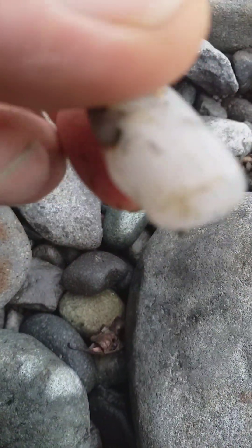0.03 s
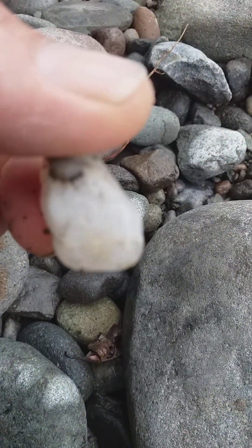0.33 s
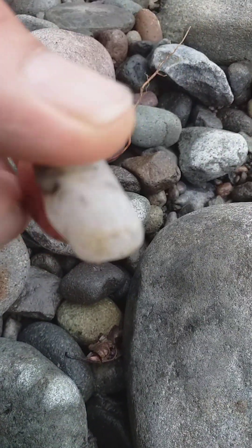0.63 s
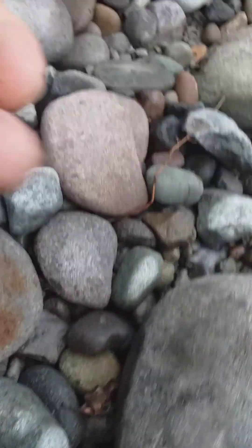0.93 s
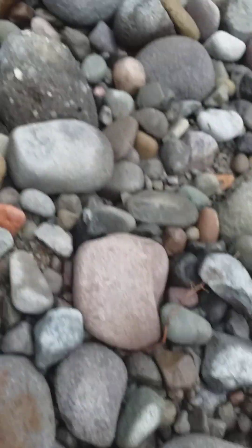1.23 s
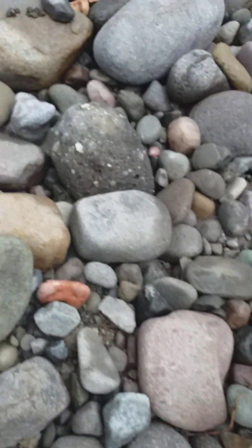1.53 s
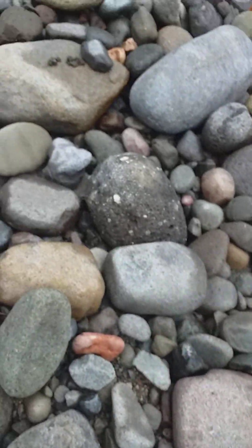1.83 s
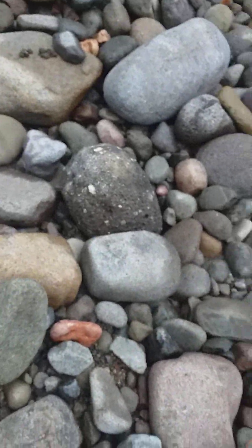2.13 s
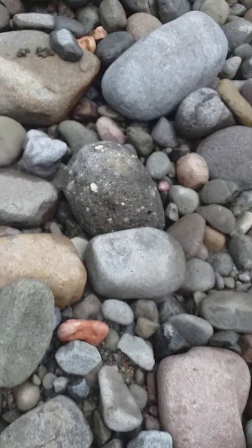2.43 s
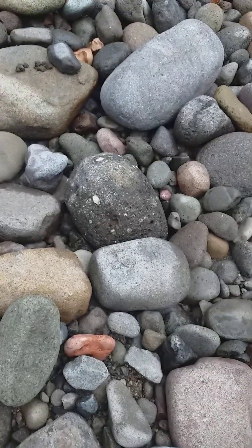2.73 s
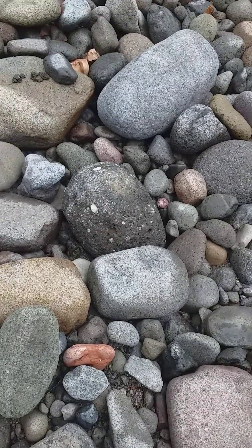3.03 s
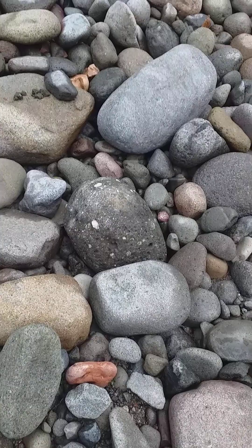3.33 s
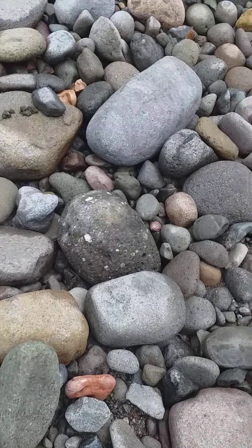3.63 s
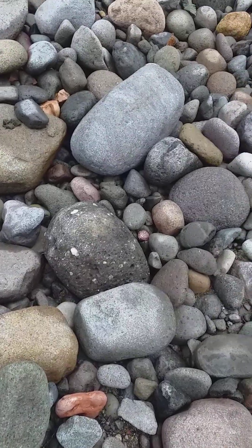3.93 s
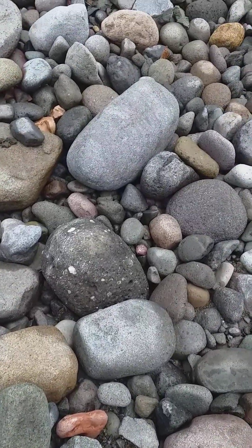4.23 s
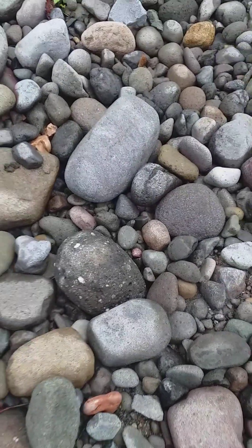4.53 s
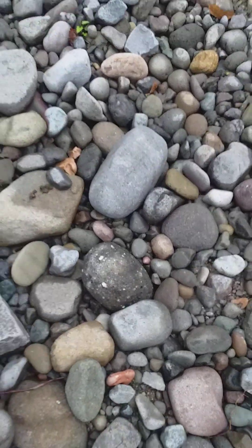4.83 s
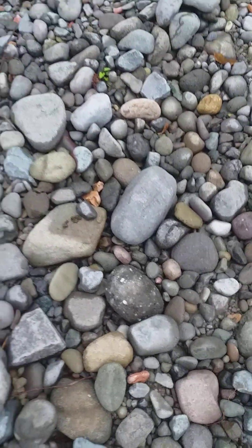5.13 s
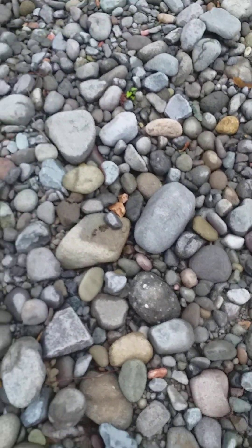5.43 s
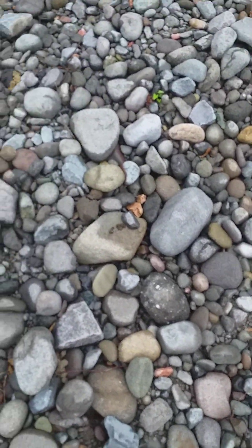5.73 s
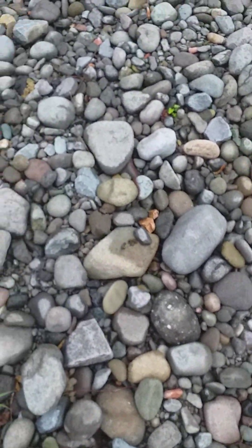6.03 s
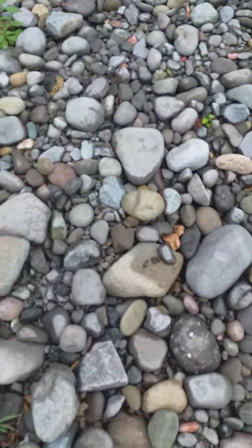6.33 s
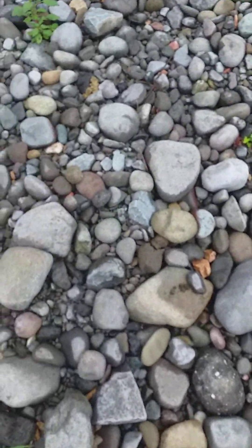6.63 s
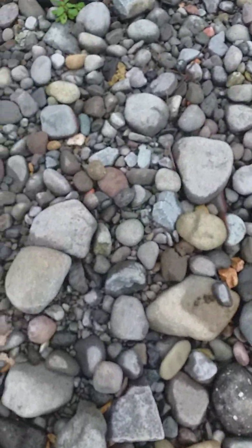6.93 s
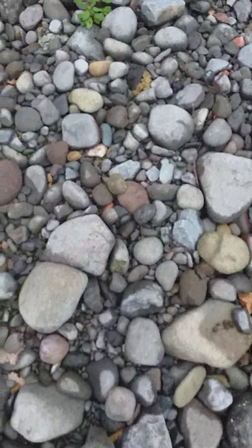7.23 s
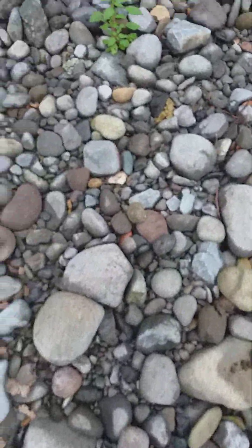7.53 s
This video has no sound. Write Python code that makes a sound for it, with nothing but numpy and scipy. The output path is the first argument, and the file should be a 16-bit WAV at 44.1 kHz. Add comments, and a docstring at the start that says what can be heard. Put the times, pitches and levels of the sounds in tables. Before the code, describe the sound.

A nearby stream hisses softly and steadily, with a faint rumble of air at first. A few small stones tick, then pebbles clack sharply underfoot about two seconds in. Feet shift on the stony bank, crunching and scraping with dull thuds, busiest just past the middle. After a short pause come a few lighter scrapes and clicks. The water grows slightly brighter as the close microphone rises.

```python
"""Feet shifting on a pebble bank as someone stands up from a crouch, a stream rushing nearby.
Stones knock and ring, gravel sticks and slips under the soles, the bed thuds under the weight.
Splashes make the stream's hiss, tumbling water its murmur; moving air rumbles faintly.
The microphone rises, so the water opens up and the dip from the ground echo slides down."""
import sys
import numpy as np
from scipy import signal
from scipy.fft import rfft, irfft
from scipy.io import wavfile
from scipy.ndimage import uniform_filter1d

SR = 44100
rng = np.random.default_rng(int(sys.argv[2]) if len(sys.argv) > 2 else 0)


def waveform_to_disk(signal):
    """Save audio, clipped to [-1, 1], as 16-bit WAV at the path in sys.argv[1]."""
    frames = np.transpose(np.atleast_2d(signal))
    scaled = np.clip(frames, -1, 1) * 32767
    samples = np.round(scaled).astype(np.int16)
    wavfile.write(sys.argv[1], SR, samples)


N = 343539
TIME_S = np.arange(N) / SR
FIRST_MOVE_S, FADE_IN_S = 0.6, 0.35
CREEP_PEBBLES_DB, CREEP_SAND_DB = -58.5, -64.5  # resting levels between scrapes

# Air at the microphone. Each row: time in seconds, level in dB.
AIR_LEVELS = [(0, -57), (.35, -60), (.7, -63.5), (1.3, -74), (1.7, -59.5), (2.0, -70), (7.3, -76),
              (7.7, -66)]
# Stream. Each row: time in seconds, relative hiss in dB, relative murmur in dB.
STREAM_LEVELS = [(0, -57, -53), (.8, -56.5, -54), (1.4, -52.5, -53.5), (2.02, -52, -53), (2.68, -56, -58.5),
                 (3.8, -49.5, -54.5), (5.15, -50, -55), (5.65, -48, -53), (6.55, -47.5, -54),
                 (7.68, -47.5, -51.5)]
# Ground echo cancellation. Each row: time in seconds, dip centre in Hz, depth in dB.
GROUND_DIPS = [(0, 1500, 3.5), (.65, 1390, 9), (1.1, 1270, 4), (1.6, 980, 2.5), (2.6, 830, 4),
               (3.7, 850, 6), (4.3, 930, 4), (5.2, 760, 1.5), (7.7, 740, 2.5)]
# Weight settling. Each row: start, rise and hold in seconds, relative level in dB.
TREADS = [(2.09, 0.044, 0.022, -42), (2.31, .04, 0.063, -53), (3.88, 0.048, 0.3, -54.5),
          (4.22, 0.025, 0.45, -47.5), (6.01, 0.054, 0.015, -45.5), (6.8, 0.057, .05, -53)]
# A faint high rustle, then sole scrapes.
# Each row: start, rise and hold in seconds, relative pebble and sand levels in dB.
RUSTLE_AND_SCRAPES = [(.68, .17, 0.057, -63, -63), (1.12, 0.021, 0.066, -53.5, -79),
                      (1.525, 0.008, 0.037, -48, -50), (1.6, 0.028, 0.095, -50.5, -74),
                      (1.82, 0.086, 0.075, -49, -55.5), (2.083, 0.006, .02, -45, -40.5),
                      (2.118, 0.0084, 0.031, -28.5, -41), (2.18, 0.0081, 0.014, -44, -42.5),
                      (2.235, 0.031, 0.011, -35, -41.5), (2.315, 0.024, 0.074, -38.5, -49),
                      (2.43, 0.017, 0.12, -51, -53), (2.62, 0.015, 0.0081, -44.5, -59),
                      (2.7, 0.074, 0.028, -56, -54.5), (2.86, .11, 0.05, -45, -48.5),
                      (3.035, 0.028, 0.18, -39, -43.5), (3.25, 0.014, 0.041, -37, -45.5),
                      (3.4, 0.017, 0.088, -44, -48), (3.51, 0.027, 0.034, -41, -44),
                      (3.62, 0.013, 0.11, -48.5, -54.5), (3.89, 0.013, 0.081, -39.5, -48.5),
                      (3.975, 0.04, 0.021, -35, -38.5), (4.055, 0.021, 0.011, -30.5, -44.5),
                      (4.14, 0.028, 0.081, -36, -43.5), (4.235, .02, 0.058, -30.5, -37),
                      (4.32, 0.021, 0.098, -34, -37.5), (4.42, 0.04, .16, -29, -39.5),
                      (4.605, 0.032, 0.0086, -27, -53), (4.66, 0.013, 0.041, -34.5, -43),
                      (5.4, 0.005, 0.2, -48, -76), (5.6, 0.035, 0.079, -45.5, -61),
                      (5.89, 0.019, 0.01, -40, -49), (5.96, .01, 0.057, -51.5, -52.5),
                      (6.02, 0.068, 0.039, -36, -56), (6.13, .02, 0.085, -53, -64),
                      (6.26, 0.042, 0.027, -41.5, -65), (6.76, 0.012, 0.14, -43.5, -55),
                      (7.4, 0.021, 0.022, -44, -65), (7.48, .02, 0.21, -54, -66)]
# Clearest stone knocks. Each row: start in seconds, relative level in dB, nominal clack centre in Hz,
# clack width in octaves, ring in Hz, t60 in seconds, relative bright crack in dB.
KNOCKS = [(1.055, -51, 2600, 0.43, 2800, 0.0088, -19), (1.1997, -46, 2770, 0.55, 2520, 0.016, -14),
          (1.332, -46.5, 3300, 0.5, 4500, 0.036, -20), (1.629, -34.5, 3800, 0.67, 4700, 0.022, -23),
          (1.7337, -44.5, 3020, 0.33, 2970, 0.03, -24), (1.8424, -42.5, 3760, 0.55, 2170, .028, -12),
          (1.903, -37, 4300, 0.49, 3030, .01, -9), (2.0935, -13.5, 3800, 0.44, 5830, 0.0092, -18),
          (2.1192, -14, 5850, 0.68, 6200, 0.013, -1), (2.2766, -22.5, 5140, 0.48, 7000, 0.0065, -21),
          (2.823, -42, 5600, .45, 6300, 0.0081, -4), (2.96, -36.5, 4540, 0.71, 3110, 0.028, -8),
          (3.088, -34, 4400, .6, 4200, .02, -9), (3.1094, -33, 4860, 1, 5100, 0.034, -11),
          (3.3476, -34, 5140, 0.47, 4340, 0.0096, 1), (3.4038, -38, 4500, 0.8, 3960, 0.014, -5),
          (3.549, -33, 5240, 0.34, 6000, 0.011, -10), (3.6587, -37.5, 3680, .65, 3000, .05, -9),
          (3.7096, -40, 3830, .65, 2650, 0.033, -2), (3.825, -30, 4300, 0.23, 4380, 0.0036, -11),
          (3.925, -35, 3920, 0.53, 3000, 0.01, -7), (4.1199, -35, 3750, .8, 3070, 0.087, -7),
          (4.1523, -38, 3600, 0.87, 3080, 0.022, -5), (4.2596, -27.5, 3400, 1, 3900, 0.042, -20),
          (4.3342, -29, 5700, 0.43, 7450, .017, -15), (4.3558, -21, 4970, 0.55, 7900, 0.021, -17),
          (4.3953, -21.5, 4350, 0.38, 3540, 0.015, -1), (4.4648, -22, 4800, 0.62, 4020, 0.17, -4),
          (4.552, -24.5, 4180, .4, 2710, 0.097, -13), (4.6252, -22.5, 3760, 0.28, 3900, 0.056, -29),
          (4.633, -21.5, 3580, 0.3, 3220, 0.073, -24), (4.657, -24, 4300, .25, 3780, 0.015, -20),
          (4.752, -35, 5100, 0.48, 3540, 0.018, -6), (4.787, -42.5, 4800, 0.41, 4150, .014, -16),
          (4.81, -39, 3400, 0.85, 1130, 0.0088, -19), (4.8402, -40, 5200, 0.69, 7100, .016, -11),
          (5.702, -36, 6800, 0.36, 7700, .015, -9), (6.0939, -28.5, 4080, 0.39, 4100, 0.035, -9),
          (6.1802, -34.5, 4300, 0.34, 3400, .013, -9.5), (6.2046, -38, 4530, 0.18, 4430, 0.0088, -24),
          (6.291, -33.5, 3960, 0.35, 4570, 0.0085, -23), (6.3147, -31.5, 4430, .45, 3530, 0.0045, -19),
          (6.421, -40.5, 4000, 0.39, 4480, 0.0088, -17), (6.792, -35.5, 3900, 0.52, 2500, 0.016, -5),
          (6.8398, -38.5, 2670, .45, 2430, 0.022, -17), (6.8851, -31, 4030, 0.37, 5200, 0.0089, -9),
          (7.0086, -28, 3380, 0.63, 4320, 0.0068, -36), (7.3293, -41, 4330, 0.38, 7160, .012, -28)]
# Source spectra. Each row: frequency in Hz, relative density in dB.
AIR_SPECTRUM = [(25, -7), (55, -3.5), (110, 3.5), (200, -4), (500, -61)]
HISS_SPECTRUM = [(60, -33.5), (300, -2), (700, 1.5), (1100, 0.5), (1800, 0), (2250, -1.5), (3000, 0.5),
                 (3800, 1.5), (4600, -1.5), (6000, -5.5), (7600, -4), (10000, -12), (16000, -18.5)]
MURMUR_SPECTRUM = [(30, -25), (55, -8), (90, -11), (150, -1.5), (250, 2), (350, 1), (500, -1), (700, -5.5),
                   (1000, -16), (2000, -45)]
BED_SPECTRUM = [(30, -31), (60, -40), (120, -4.5), (250, 1.5), (400, -2.5), (700, -4), (1200, -13.5),
                (2500, -41)]
SAND_SPECTRUM = [(1500, -4.5), (4000, 3), (7000, 4), (9500, -1), (12000, -1.5), (16000, -13.5)]
PEBBLE_SPECTRUM = [(50, -56), (200, -29), (600, -13), (1000, -4.5), (1450, -4), (2000, -2), (3000, -1),
                   (3950, 4), (5000, -2), (7500, -5), (10000, -11.5), (16000, -7.5)]
# Microphone response. Each row: frequency in Hz, gain in dB.
MIC_RESPONSE = [(30, -28), (42, -15), (55, 0), (7600, -1.5), (8100, -5), (8700, -12), (10000, -8.5),
                (12000, -5.5), (16000, -4)]


def amp(db):
    """Decibels to gain."""
    return 10 ** (np.asarray(db) / 20)


def unit_rms(x):
    """Scales to rms 1."""
    return x / np.sqrt(np.mean(x ** 2) + 1e-20)


def add(mix, start_s, sound):
    """Mixes a sound in place."""
    part = mix[round(start_s * SR):][:len(sound)]
    part += sound[:len(part)]


def follow(rows, column, t=TIME_S):
    """One table column, interpolated over time."""
    rows = np.asarray(rows)
    return np.interp(t, rows[:, 0], rows[:, column])


def minimum_phase(db):
    """Sharpest-starting impulse response with this spectrum."""
    log_gain = np.log(amp(np.concatenate([db, db[-2:0:-1]])))
    return np.fft.ifft(np.exp(np.conj(signal.hilbert(log_gain)))).real


def coloured(x, spectrum, size=2048):
    """Filters by a spectrum table without blurring attacks."""
    table_hz, table_db = np.transpose(spectrum)
    hz = np.fft.rfftfreq(size, 1 / SR)
    db = np.interp(np.log(hz + 1), np.log(table_hz + 1), table_db)
    return signal.oaconvolve(x, minimum_phase(db))[:N]


def wander(rate_hz):
    """Random drift of rms 1, up to about this rate."""
    hz = np.fft.rfftfreq(N, 1 / SR)
    return unit_rms(irfft(rfft(rng.standard_normal(N)) / (1 + (hz / rate_hz) ** 4), N))


def clicks(per_s, spread_db):
    """Random impulses of either sign, many small, a few large."""
    strength = amp(spread_db * np.minimum(rng.exponential(1, N), 3.5))
    return strength * rng.choice([-1, 1], N) * (rng.random(N) < per_s / SR)


def pushes_db(rows, column, rest_db, release_db_per_s=432):
    """Level of pushes over a resting level: each builds, holds and dies away."""
    power = np.full(N, amp(rest_db) ** 2)
    t = np.arange(SR) / SR
    for row in rows:
        start_s, rise_s, hold_s = row[:3]
        attack = np.minimum(t / max(rise_s, 1 / SR), 1)
        release = amp(-release_db_per_s * np.maximum(t - rise_s - hold_s, 0))
        add(power, start_s, (amp(row[column]) * attack * release) ** 2)
    return 10 * np.log10(power)


def scatter(t60_s, size=4096):
    """Dying reflections off nearby stones, energy 1."""
    tail = rng.standard_normal(size) * amp(-60 * np.arange(size) / SR / t60_s)
    return tail / np.linalg.norm(tail)


def bank_reflections(x, wet_db=-10, t60_s=0.026, count=5):
    """Adds short echoes off the stones; their pattern shifts as feet and microphone move."""
    paths = np.array([wander(rate_hz=13.5) for _ in range(count)])
    paths /= np.linalg.norm(paths, axis=0)
    return x + amp(wet_db) * sum(signal.oaconvolve(x * path, scatter(t60_s))[:N] for path in paths)


def ground_dip(x, width_oct=0.36, size=1024):
    """The ground echo cancels one band, lower as the microphone rises."""
    hz, t, spectra = signal.stft(x, SR, nperseg=size)
    offset = np.log2((hz[:, None] + 1) / follow(GROUND_DIPS, 1, t)) / width_oct
    cut_db = follow(GROUND_DIPS, 2, t) * np.exp(-offset ** 2 / 2)
    return signal.istft(spectra * amp(-cut_db), SR, nperseg=size)[1][:N]


def air():
    """Faint, lumpy rumble of moving air."""
    rumble = unit_rms(coloured(rng.standard_normal(N), AIR_SPECTRUM, size=8192))
    return rumble * amp(follow(AIR_LEVELS, 1) + 3.6 * wander(rate_hz=12))


def stream(hiss_gain_db=3):
    """Countless small splashes hiss; tumbling water murmurs."""
    splashes = unit_rms(clicks(per_s=5000, spread_db=5.5))
    hiss = unit_rms(coloured(rng.standard_normal(N) + 0.63 * splashes, HISS_SPECTRUM))
    murmur = unit_rms(coloured(rng.standard_normal(N), MURMUR_SPECTRUM))
    hiss_db = follow(STREAM_LEVELS, 1) + hiss_gain_db + 0.5 * wander(rate_hz=84)
    murmur_db = follow(STREAM_LEVELS, 2) + 1.2 * wander(rate_hz=27)
    return hiss * amp(hiss_db) + murmur * amp(murmur_db)


def bed_thuds(gain_db=1):
    """Buried stones bump dully under the weight."""
    bumps = unit_rms(coloured(clicks(per_s=600, spread_db=3), BED_SPECTRUM))
    return bumps * amp(pushes_db(TREADS, 3, rest_db=-65) + gain_db)


def stick_slip(pressure, slip_s=0.0013, creep=1.68):
    """Envelope of sliding: jerks over a steady creep, crowding and evening out under load."""
    age = np.arange(1024) / SR / slip_s
    onsets = abs(clicks(per_s=300 * pressure, spread_db=1.5))
    jerks = signal.oaconvolve(onsets, age * np.exp(-age))[:N]
    return unit_rms(creep + unit_rms(jerks / pressure ** 0.8))


def pebble_ticks(per_s, t60_s=0.0094, spread_db=4, candidates=12000, size=400):
    """Each pebble ticks at its own pitch, damped at once by its neighbours."""
    when, chance, pitch, strength, phase = rng.random((candidates, 5)).T
    onset = (when * (N - size)).astype(int)
    struck = chance < per_s[onset] * N / SR / candidates
    t = np.arange(size) / SR
    hz = 900 + 8100 * pitch[struck, None]
    peak_db = spread_db * np.minimum(-np.log(1 - strength[struck, None]), 3)
    ticks = amp(peak_db - 60 * t / t60_s) * np.sin(2 * np.pi * (hz * t + phase[struck, None]))
    return np.bincount((onset[struck, None] + np.arange(size)).ravel(), ticks.ravel(), N)


def grinding(load_db, sand_db, sand_gain_db=7, tick_share=0.19, patchy_db=2, size=128):
    """Gravel sticks and slips in clumps of scratches, pebble ticks and sand."""
    pressure = amp(0.35 * (load_db + 33))  # more stones move as the foot bears down
    slips = stick_slip(pressure)
    ticks = unit_rms(pebble_ticks(per_s=1100 * pressure) / np.sqrt(pressure))
    scratches = unit_rms(clicks(per_s=5500 * pressure, spread_db=3.5) / np.sqrt(pressure))
    contacts = np.sqrt(tick_share) * ticks + np.sqrt(1 - tick_share) * scratches
    # Each slip moves other stones, so the colour varies.
    spectra = signal.stft(contacts, nperseg=size)[2]
    patches = uniform_filter1d(rng.standard_normal(spectra.shape), size=5, axis=0)
    patches = unit_rms(uniform_filter1d(patches, size=4, axis=1))
    contacts = signal.istft(spectra * amp(patchy_db * patches), nperseg=size)[1][:N]
    pebbles = unit_rms(coloured(contacts, PEBBLE_SPECTRUM)) * amp(load_db)
    grains = clicks(per_s=9000, spread_db=6)
    sand = unit_rms(coloured(grains, SAND_SPECTRUM)) * amp(sand_db + sand_gain_db)
    fade_in = np.clip((TIME_S - FIRST_MOVE_S) / FADE_IN_S, 0, 1)
    return fade_in * slips * (pebbles + sand)


def knock(centre_hz, width_oct, ring_hz, t60_s, crack_db, ring_db=-7, body_db=-18, size=2048):
    """Rough faces bite in a burst of tiny contacts, coloured by stone size; the gap between rings."""
    t, hz = np.arange(size) / SR, np.fft.rfftfreq(size, 1 / SR)
    age = t / (0.063 * t60_s)
    bite = rng.choice([-1, 1], size) * np.sqrt(age) * np.exp(-age)
    rattle = 0.71 * scatter(2.1 * t60_s, size)
    contact = bite / np.linalg.norm(bite) + rattle
    contact[0] += 0.4  # clean first touch
    hump = np.exp(-(np.log2((hz + 20) / centre_hz) / width_oct) ** 2 / 4)
    crack = amp(crack_db - 7) * hz ** 2 / (hz ** 2 + 6000 ** 2)
    body = amp(body_db) * np.exp(-np.log2((hz + 20) / 1300) ** 2 / 2)
    colour_db = 20 * np.log10(hump + crack + body + 0.00058)
    clack = signal.fftconvolve(contact, minimum_phase(colour_db))[:size]
    ring = np.sin(2 * np.pi * ring_hz * t) * amp(-60 * t / t60_s)
    sound = unit_rms(clack) + amp(ring_db) * unit_rms(ring)
    return sound / np.sqrt(np.sum(sound ** 2) / (0.006 * SR))  # energy of 6 ms at rms 1


def stray_stones(load_db, per_s=10, base_db=-47, spread_db=7):
    """Small stones slip and click at random, harder under load."""
    out = np.zeros(N)
    first_s = FIRST_MOVE_S + FADE_IN_S
    span_s = N / SR - first_s
    for when, strength, stone, gap in rng.uniform(-0.92, 1, (int(per_s * span_s), 4)):
        start_s = first_s + span_s * (when + 1) / 2
        push_db = np.interp(start_s, TIME_S, load_db) - CREEP_PEBBLES_DB
        level_db = base_db + spread_db * strength + 0.27 * push_db
        centre_hz = 4060 * 2 ** (0.62 * stone)
        ring_hz = centre_hz * 2 ** (0.24 * gap)
        click = knock(centre_hz, width_oct=0.97, ring_hz=ring_hz, t60_s=0.029, crack_db=-14)
        add(out, start_s, amp(level_db) * click)
    return out


def tipping_stones(gain_db=2, centre_ratio=0.98):
    """Single stones tip over and strike their neighbours."""
    out = np.zeros(N)
    for start_s, level_db, centre_hz, width_oct, ring_hz, t60_s, crack_db in KNOCKS:
        hit = knock(centre_hz * centre_ratio, max(width_oct, 0.2), ring_hz, max(t60_s, 0.004), crack_db)
        add(out, start_s, amp(level_db + gain_db) * hit)
    return out


def scene():
    """Feet, stream and air over the pebble bank, mono."""
    uneven_db = 0.7 * wander(rate_hz=22)  # a push is never quite steady
    load_db = pushes_db(RUSTLE_AND_SCRAPES, 3, rest_db=CREEP_PEBBLES_DB) + uneven_db
    sand_db = pushes_db(RUSTLE_AND_SCRAPES, 4, rest_db=CREEP_SAND_DB) + uneven_db
    feet = tipping_stones() + grinding(load_db, sand_db) + stray_stones(load_db)
    return ground_dip(bank_reflections(feet) + bed_thuds() + stream() + air())[None]


def record(dry, clip_level=0.85, cutoff_hz=15950):
    """Small microphone: a step down in the top octave, overload clipping, band limit."""
    heard = np.clip(coloured(dry[0], MIC_RESPONSE, size=8192), -clip_level, clip_level)
    lowpass = signal.firwin(401, cutoff_hz, window=("kaiser", 8), fs=SR)
    return signal.oaconvolve(heard, lowpass, "same")[None]


dry = scene()
out = record(dry)
waveform_to_disk(out)
```